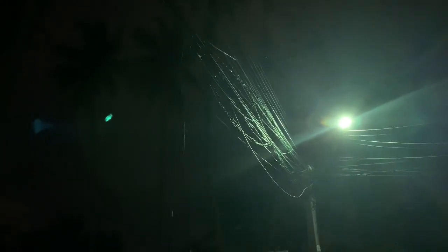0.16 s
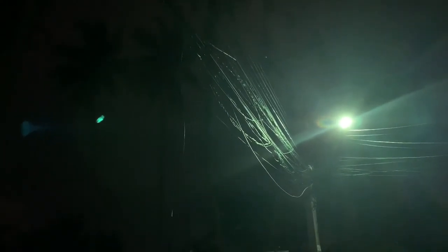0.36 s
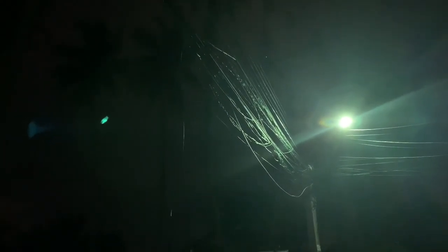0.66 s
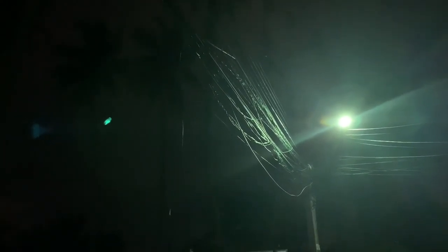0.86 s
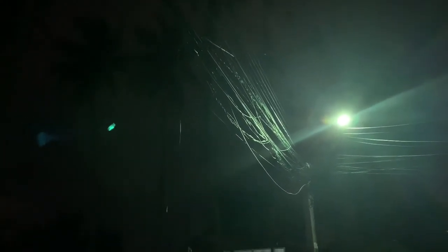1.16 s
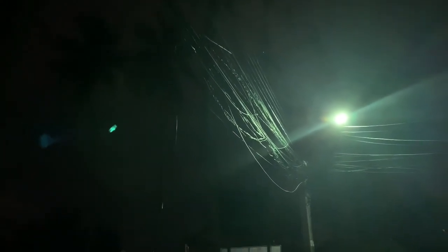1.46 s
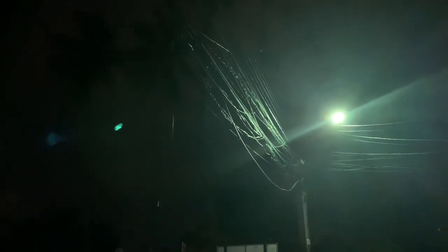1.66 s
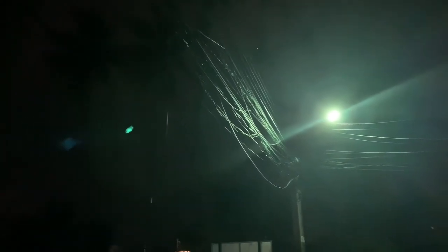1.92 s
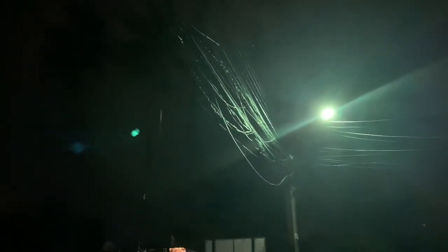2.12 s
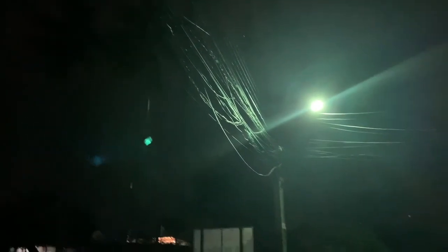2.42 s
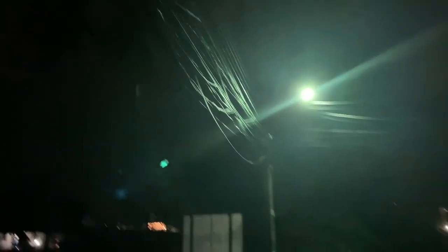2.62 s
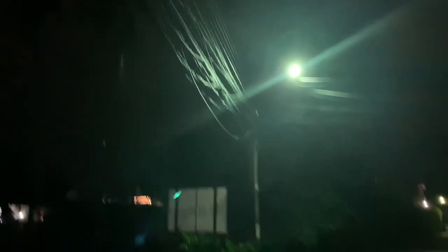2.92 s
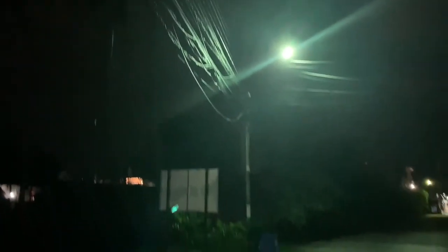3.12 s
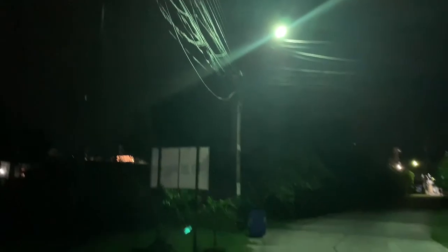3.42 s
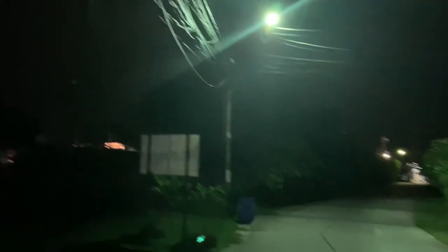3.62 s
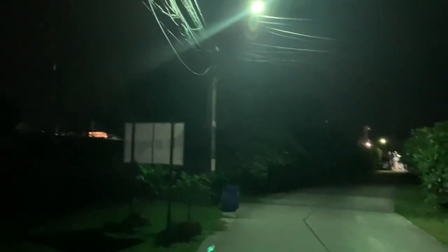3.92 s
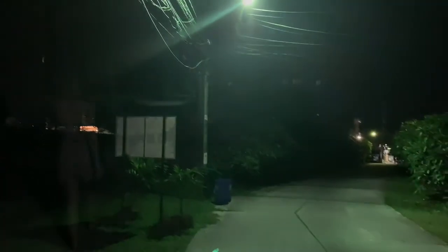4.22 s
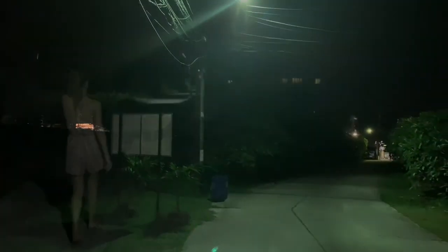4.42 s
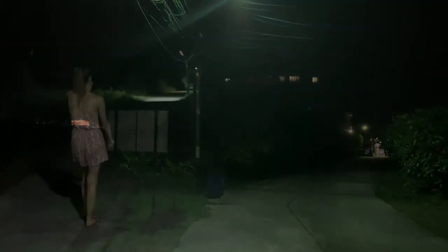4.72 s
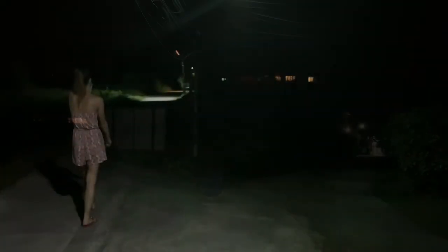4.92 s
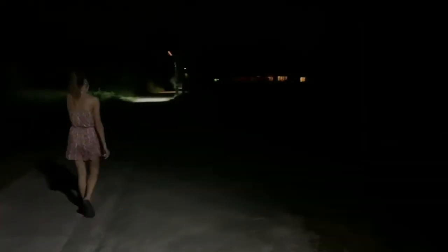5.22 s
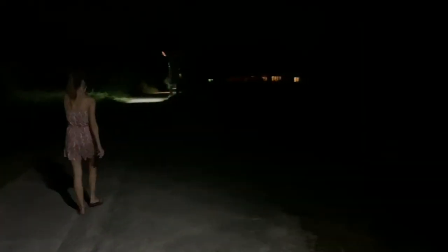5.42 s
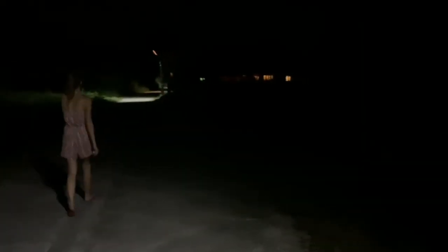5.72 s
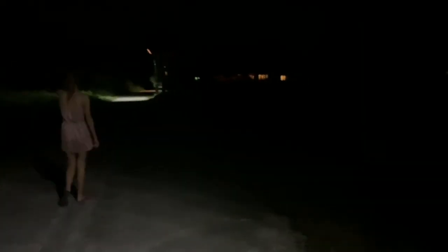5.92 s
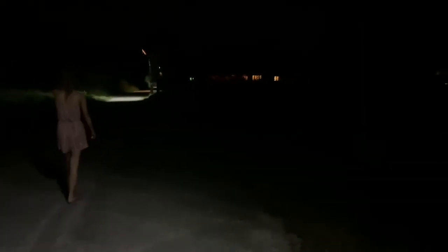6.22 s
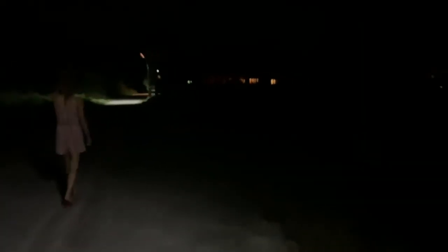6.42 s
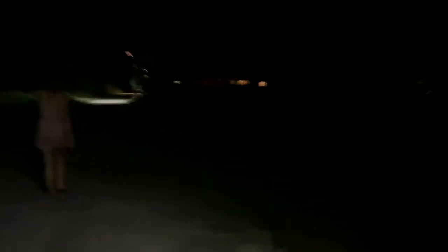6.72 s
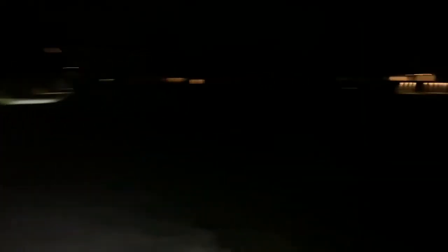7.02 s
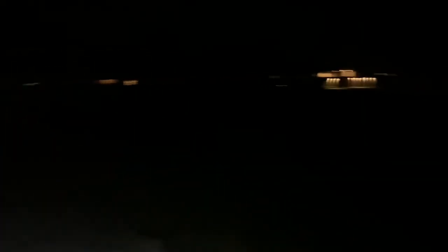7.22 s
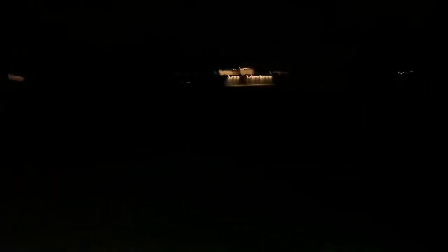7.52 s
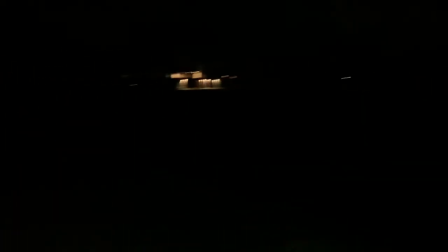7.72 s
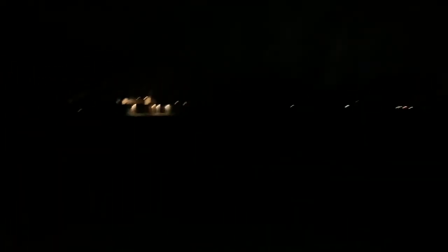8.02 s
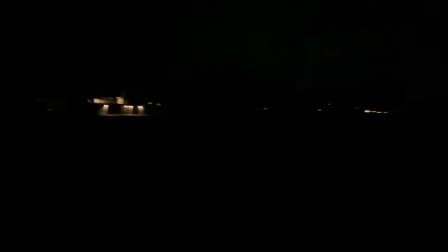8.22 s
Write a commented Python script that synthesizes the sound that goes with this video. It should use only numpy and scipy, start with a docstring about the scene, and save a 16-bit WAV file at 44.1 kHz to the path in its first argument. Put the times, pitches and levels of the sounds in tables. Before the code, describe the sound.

Outdoors at night, a fine, bright electrical buzz sizzles near a power pole, with a thin insect-like trill and a far single-cylinder engine puttering past, then easing off. After about four seconds this crossfades into a marsh: near and far frogs rattle, insects hiss, and one loud shrill trill dominates, pausing briefly. A few soft sandal slaps fall close to the handheld stereo microphone.

```python
"""A sizzle of sparks, a thudding far engine and a thin trill by a power pole dissolve into a marsh at night.
There, frogs rattle, one loud shrill trill calls with short rests, and insects hiss. Now and then a sandal step slaps.
Sparks, engine, frogs and steps are short pulses or noise puffs, most of them ringing a few resonances.
Trills are sliding tones; insects and night air are shaped noise; hums, a peep and a whistle are wavering tones."""
import sys
import numpy as np
from scipy import signal
from scipy.fft import rfft, irfft, next_fast_len
from scipy.io import wavfile
from scipy.ndimage import uniform_filter1d, map_coordinates

SR = 44100
rng = np.random.default_rng(int(sys.argv[2]) if len(sys.argv) > 2 else 0)


def generate_wav(sig):
    """Save sig (samples, or channels by samples) to the path in sys.argv[1] as 16-bit PCM at SR."""
    pcm = np.round(np.clip(np.atleast_2d(sig).T, -1, 1) * 32767).astype(np.int16)
    wavfile.write(sys.argv[1], SR, pcm)


N = 368676
T = np.arange(N) / SR   # time of every sample (s)
# the microphone tilts down, and later turns across the marsh: (from s, to s)
TILT_S, TURN_S = (2.47, 2.78), (7.1, 7.65)


def from_db(db):
    """Turn decibels into gain."""
    return 10 ** (np.asarray(db) / 20)


def rms_one(x):
    """Scale to unit power."""
    return x / np.sqrt(np.mean(x ** 2) + 1e-20)


def ramp(start_s, end_s):
    """Rise from 0 to 1 between two moments."""
    return np.interp(T, [start_s, end_s], [0, 1])


def in_time(rows):
    """Read each column of a table at every sample; the first column is time."""
    s, *columns = np.transpose(rows)
    return [np.interp(T, s, column) for column in columns]


def at_hz(points, hz):
    """Read a table over frequency, joining its points on a log axis."""
    f, value = np.transpose(points)
    return np.interp(np.log(hz + 1), np.log(f), value)


def drift(rate):
    """Wander smoothly and at random with a spread of 1; a higher rate (per s) wanders faster."""
    knots = rng.standard_normal(4000)
    coarse_time = T[::20]
    curve = map_coordinates(knots, [coarse_time * rate * 2], order=3, mode="wrap")
    return np.interp(T, coarse_time, rms_one(curve))


def wavering_turns(hz, spread, rate):
    """Count the cycles of a tone whose pitch wavers by a share (spread) of itself."""
    return np.cumsum(hz * (1 + spread * drift(rate))) / SR


def band(x, hz, width_hz):
    """Pass one flat-topped resonance."""
    edges = np.clip([hz - width_hz / 2, hz + width_hz / 2], 10, .48 * SR)
    return signal.sosfilt(signal.butter(2, edges, "band", fs=SR, output="sos"), x + 1e-18)


def clicks(times, sizes):
    """Place single-sample pulses at the given times."""
    inside = (times >= 0) & (times < (N - 1) / SR)
    return np.bincount((times[inside] * SR).astype(int), sizes[inside], N)


def bursts(pulses, length_s):
    """Turn each pulse into a short puff of noise."""
    window = np.hanning(max(3, int(length_s * SR)))
    return signal.fftconvolve(pulses, window, "same") * rng.standard_normal(N)


def body(pulses, modes, vary_db):
    """Let pulses ring a set of resonances whose balance keeps wandering."""
    return sum(from_db(db + vary_db * drift(40)) * rms_one(band(pulses, hz, width))
               for hz, width, db in modes)


def levelled(x, span_s):
    """Even out the slow loudness and keep the pulsing."""
    power = uniform_filter1d(np.mean(np.atleast_2d(x) ** 2, axis=0), int(span_s * SR))
    return x / np.sqrt(np.abs(power) + .03 * power.max())   # the floor keeps silence quiet


def placed(x, lag_ms, pan_db):
    """Set a source to one side: the left ear hears it later by lag_ms and louder by pan_db."""
    left = np.interp(T - lag_ms / 1000, T, x)
    return np.array([left * from_db(pan_db / 2), x * from_db(-pan_db / 2)])


def outdoors(x, wet_db, t60):
    """Scatter a short tail (60 dB down after t60 s) off road, trunks and leaves; its pattern keeps shifting."""
    age = T[:SR // 2]
    tails = rng.standard_normal((2, 2, len(age))) * from_db(-60 * age / t60) * (age > .003)
    tails /= np.sqrt(np.sum(tails ** 2, axis=2, keepdims=True))
    here, there = signal.fftconvolve(x[None], tails, axes=2)[:, :, :N]
    moved = 2 * np.pi * T + drift(2)   # about one turn a second
    return x + from_db(wet_db) * (np.cos(moved) * here + np.sin(moved) * there)


def beats(first_s, count, gap_s, brisk=(0, 1), tired=(0, 1)):
    """Time the notes of one call: even, but for a brisk start and a tired end (notes, share of the gap)."""
    k = np.arange(count - 1)
    start_share = np.where(k < brisk[0], brisk[1], 1)
    end_share = np.where(k >= len(k) - tired[0], tired[1], 1)
    return first_s + np.append(0, np.cumsum(gap_s * start_share * end_share))


def trill(times, hz, fall_hz, rise_s, fade_s, taper, waver, rough_db, tail=0, bend=0):
    """Each note is a pure tone that swells, then dies as its pitch slides down, ever faster if bent."""
    note = np.searchsorted(times[1:] - rise_s, T)
    age = T - times[note]
    through = np.clip(age / np.where(age < 0, rise_s, fade_s), -1, 1)
    slide = np.clip(age / (rise_s + fade_s), -1, 1)
    wavering = 1 + waver * rng.standard_normal(len(times))[note] + waver * drift(200)
    pitch = (hz - fall_hz * (slide + bend * slide ** 2)) * wavering
    swell = np.abs(np.cos(through * np.pi / 2)) ** taper
    lingering = tail * np.sin(np.pi * np.maximum(through, 0) ** 2)   # a soft tail
    return (swell + lingering) * from_db(rough_db * drift(150)) * np.sin(2 * np.pi * np.cumsum(pitch) / SR)


def air(spectrum):
    """Far rumble and hiss: noise shaped over frequency, much alike in both ears only in the bass."""
    # left-right likeness: f/Hz, likeness (1 = the same)
    likeness = [(50, 0.87), (200, 0.88), (500, 0.28), (1000, 0.027), (4000, 0.033), (12000, 0.092)]
    size = next_fast_len(N)
    hz = np.arange(size // 2 + 1) * SR / size
    mid, side = rfft(rng.standard_normal((2, size))) * from_db(at_hz(spectrum, hz))
    alike = np.clip(at_hz(likeness, hz), -1, 1)
    both_ears = np.sqrt(1 + alike) * mid + np.sqrt(1 - alike) * side * [[1], [-1]]
    return rms_one(irfft(both_ears, size)[:, :N])


def insects(choirs, lag_ms, spread_db=-4):
    """Countless far wings blur into fluttering bands of noise, partly from one side, partly all round."""
    one_side = placed(rng.standard_normal(N), lag_ms, pan_db=-2.5)
    wings = one_side + from_db(spread_db) * rng.standard_normal((2, N))
    return sum(from_db(db + flutter_db * drift(per_s)) * rms_one(band(wings, hz, width))
               for hz, width, db, per_s, flutter_db in choirs)


def hums():
    """Each faint far hum swells and fades on a slightly wavering pitch."""
    # hums: start t/s, end t/s, f/Hz, level/dB
    hum_rows = [(0.8, 3.9, 445, -67), (3.7, 4.96, 386.5, -63.5)]
    tones = 0
    for start, end, hz, db in hum_rows:
        swell = np.sqrt(np.abs(np.sin(np.pi * ramp(start, end))))
        tones = tones + from_db(db) * swell * np.sin(2 * np.pi * wavering_turns(hz, 0.0056, 4.1))
    return placed(tones, lag_ms=0, pan_db=0)


def whistle():
    """One faint falling tone, blurred by a strong tail and a wavering pitch."""
    # path of the call: t/s, f/Hz, level/dB
    falling_call = [(1.34, 1420, -86), (1.45, 1326, -74), (1.58, 1243, -69), (1.7, 1193, -79),
                    (1.9, 1133, -91)]
    hz, db = in_time(falling_call)
    tone = from_db(db) * np.sin(2 * np.pi * wavering_turns(hz, 0.024, 80))
    return outdoors(placed(tone, lag_ms=0, pan_db=1), wet_db=9.0, t60=0.39)


def far_trills():
    """Distant callers of the shrill kind blur into a faint line of sliding notes."""
    # callers: f/Hz, gap between notes/s, level/dB
    far_callers = [(3354, .0345, -60), (3300, .0372, -63), (3080, 0.074, -68.5)]
    voices = sum(from_db(db) * trill(np.arange(0, T[-1], gap_s), hz, fall_hz=450, rise_s=.015, fade_s=.016,
                                     taper=2.2, waver=0.012, rough_db=1.5)
                 for hz, gap_s, db in far_callers)
    return outdoors(placed(voices, lag_ms=0.1, pan_db=2.5), wet_db=0.5, t60=0.16)


def frog_chorus(lag_ms, count=6):
    """Farther frogs rattle over one another: pulse trains, each at its own pace, ring shared resonances."""
    # throat resonances: f/Hz, width/Hz, level/dB
    chorus_modes = [(1555, 300, -0.5), (1862, 220, -5.5), (2500, 1700, -10.5), (3185, 545, 5.5)]
    pulses = np.zeros(N)
    for per_s in np.linspace(48, 62, count):
        turns = np.floor(np.cumsum(per_s * (1 + .04 * drift(3))) / SR + rng.random())
        pulses += np.diff(turns, prepend=turns[0]) * from_db(1.8 * drift(2.0))
    throats = body(pulses, chorus_modes, vary_db=3.0)
    voices = outdoors(placed(throats, lag_ms, pan_db=-1.3), wet_db=-2.5, t60=0.48)
    level_db = -45 - 1.5 * ramp(*TURN_S)   # a little softer as the microphone turns
    return from_db(level_db) * levelled(voices, span_s=0.61)


def drone(speed, turns):
    """Low multiples of the firing rate sound as tones that swell and fade, firmer the faster the engine runs."""
    # tones: multiple of the firing rate, level/dB
    orders = [(3, -5), (4, -8), (5, -5), (6, 0), (7, -6)]
    tones = sum(from_db(db + 2.5 * drift(1.2)) * np.sin(2 * np.pi * (order * turns + rng.random()))
                for order, db in orders)
    level_db = -47.5 - 2 * (speed.max() - speed)   # 2 dB softer for each firing per s below top speed
    return placed(from_db(level_db) * levelled(tones, span_s=0.45), lag_ms=0, pan_db=-4)


def engine():
    """A single-cylinder engine: each firing is a dull exhaust thud with a close echo, over a low drone."""
    # engine speed: t/s, firings per s
    engine_speed = [(.9, 13), (1.054, 15.5), (1.25, 19), (1.6, 17.2), (2.012, 18), (2.541, 19.8),
                    (2.984, 20.9), (3.517, 20.4), (3.982, 14.1), (4.767, 13.9)]
    firing_s = 1.046   # the moment of one firing; all others follow from the speed
    echo_s, echo_db = .009, -16
    enters_s, attack_s, far_db = 0.6, 0.62, -23   # it swells from this far below full level
    shut_s, idle_s, release_s = 3.52, 3.93, 0.056   # throttle shuts; picks up at idle; length of each change
    speed, = in_time(engine_speed)
    turns = np.cumsum(speed) / SR
    turns = turns - np.interp(firing_s, T, turns)
    times = T[1:][np.diff(np.floor(turns)) > 0]
    strength = from_db(rng.standard_normal(len(times)))
    firings = clicks(times, strength) + clicks(times + echo_s, from_db(echo_db) * strength)
    muffler = signal.cheby1(8, 1, 292, fs=SR, output="sos")   # dulls everything above 292 Hz
    muffled = signal.sosfilt(muffler, band(firings, 168, 183))
    exhaust = muffled + from_db(-22.5) * band(firings, 398, 77)   # with a faint pipe ring
    thuds = outdoors(placed(exhaust, lag_ms=0, pan_db=-0.7), wet_db=-15, t60=.3)
    throttle_db = -10 * ramp(shut_s, shut_s + release_s) + 4 * ramp(idle_s, idle_s + release_s)
    far = 1 - ramp(enters_s, enters_s + attack_s)
    running = from_db(-45.5) * levelled(thuds, span_s=1.0) + drone(speed, turns)
    return from_db(far_db * far) * from_db(throttle_db) * running


def peep(lag_ms):
    """One short reedy note out of the marsh: a few upper partials of one pitch."""
    # partials: multiple of the pitch, level/dB
    partials = [(3, -50), (5, -42), (6, -57)]
    start_s, end_s, hz = 4.955, 5.012, 696
    turns = wavering_turns(hz, 0.0028, 87)
    tone = sum(from_db(db) * np.sin(2 * np.pi * k * turns) for k, db in partials)
    swell = np.sin(np.pi * ramp(start_s, end_s))
    return outdoors(placed(swell * tone, lag_ms, pan_db=2.0), wet_db=-1, t60=0.17)


def high_trill():
    """A faint, very high caller joins briefly with steeply sliding, uneven notes."""
    times = beats(first_s=4.935, count=12, gap_s=.0496)
    notes = trill(times, hz=5200, fall_hz=1300, rise_s=0.011, fade_s=0.021, taper=1.4, waver=.01, rough_db=3)
    uneven_db = 2.5 * drift(6)
    return outdoors(placed(from_db(-57.5 + uneven_db) * notes, lag_ms=0.069, pan_db=-1.0), wet_db=-10, t60=0.19)


def thin_trill():
    """A thin trill: a few slow, quickening notes, then 24 a second. A lower neighbour answers faintly."""
    # answering calls: first note t/s, notes, level/dB
    replies = [(1.105, 5, -60), (1.74, 3, -63), (2.18, 2, -62), (3.427, 2, -53)]
    reply_gap_s = .07
    first, count, gap, shortening = 1.095, 7, .079, .0023   # opening: s, notes, first gap s, s less each gap
    slow_notes = first + np.append(0, np.cumsum(gap - shortening * np.arange(count - 1)))
    answers = np.concatenate([beats(s, notes, reply_gap_s) for s, notes, _ in replies])
    answer_db, = in_time([(s + k * reply_gap_s, db) for s, notes, db in replies for k in (0, notes)])
    opening = trill(slow_notes, hz=4270, fall_hz=720, rise_s=.016, fade_s=.034, taper=6,
                    waver=.006, rough_db=2.2, tail=.2, bend=.6)
    run_times = beats(first_s=1.609, count=76, gap_s=.04172, brisk=(5, .92))
    running = trill(run_times, hz=4175, fall_hz=500, rise_s=.017, fade_s=.026, taper=3.2,
                    waver=.005, rough_db=2.2, tail=.22, bend=.8)
    answer = trill(answers, hz=3100, fall_hz=450, rise_s=.012, fade_s=.026, taper=1.6, waver=.004, rough_db=2)
    opening_db = -44.5 - 13 * (1 - ramp(first, first + 0.22))   # starts 13 dB down
    running_db = -50.5 + 3.5 * ramp(*TILT_S)   # louder as the microphone tilts down
    voice = from_db(opening_db) * opening + from_db(running_db) * running + from_db(answer_db) * answer
    return outdoors(placed(voice, lag_ms=0.034, pan_db=1.0), wet_db=-3.5, t60=0.084)


def steps(slap_t60=0.026, grit_t60=0.05):
    """A sole slaps out a hollow puff of air and grinds a little grit: two quickly dying noises."""
    # steps and scuffs: t/s, slap level/dB, grit level/dB
    footfalls = [(0.254, -53, -40), (4.528, -47, -62), (6.369, -47.5, -66), (6.515, -30, -62),
                 (6.609, -53, -60), (6.686, -49, -66), (7.531, -36.5, -47), (7.543, -37.5, -34),
                 (7.59, -44, -66), (8.159, -35.5, -60)]
    # hollow rings of the slap: f/Hz, width/Hz, level/dB
    slap_modes = [(199, 39, -12.5), (537, 340, -6), (977, 240, -6)]
    slap, grit = np.zeros((2, N))
    for s, db, grit_db in footfalls:
        age = np.clip(T - s, 0, 1)
        slap += (T > s) * from_db(db - 60 * age / slap_t60)
        grit += (T > s) * from_db(grit_db - 60 * age / grit_t60)
    # the square root makes up for what a narrow band loses
    puff = sum(from_db(db) * np.sqrt(SR / 2 / width) * band(slap * rng.standard_normal(N), hz, width)
               for hz, width, db in slap_modes)
    slaps = outdoors(placed(puff, lag_ms=0.23, pan_db=5.5), wet_db=-10, t60=0.31)
    soften = signal.butter(1, 4000, fs=SR, output="sos")
    return slaps + signal.sosfilt(soften, grit * rng.standard_normal((2, N)))


def sparks(vary_db):
    """Sparks jump near each voltage crest of the mains, somewhat harder on one polarity."""
    # sparks within one mains cycle: delay/s, scatter/s, chance (0 to 1), level/dB
    spark_rows = [(.0081, 0.00014, 1, 3.5), (0.0097, 0.0003, 1, 4.5), (.0148, .0004, .7, -17),
                  (0.0167, .0003, 0.66, 1.5), (0.019, 0.00053, 1, 1)]
    mains_hz = 49.977
    cycles, train = np.arange(0, 5.1, 1 / mains_hz), 0
    for delay, scatter, chance, db in spark_rows:
        late, size = rng.standard_normal((2, len(cycles)))
        sizes = from_db(db + vary_db * size) * (rng.random(len(cycles)) < chance)
        train = train + clicks(cycles + delay + scatter * late, sizes)
    return bursts(train, length_s=0.0014)


def sizzle():
    """Two insulators spark, one duller, one brighter and more to the left; their rings have steep edges."""
    # rings of the sparks, dull to bright: f/Hz, width/Hz, level/dB
    spark_modes = [(7060, 3200, -8), (10190, 2320, 0), (13270, 2100, 4), (15500, 700, -12)]

    def ringing(puffs, modes):
        """Filter each ring twice for steep edges."""
        return sum(from_db(db) * rms_one(band(band(puffs, hz, width), hz, width)) for hz, width, db in modes)

    dull_rings = ringing(sparks(vary_db=-1.4), spark_modes[:2])
    dull = outdoors(placed(dull_rings, lag_ms=0.022, pan_db=-0.5), wet_db=-8.5, t60=0.3)
    bright_rings = ringing(sparks(vary_db=1.7), spark_modes[2:])
    bright = outdoors(placed(bright_rings, lag_ms=0.014, pan_db=4.0), wet_db=-9, t60=0.3)
    tilt = ramp(*TILT_S)
    crackle = dull + from_db(4 * (tilt - .5)) * bright   # brightens by 4 dB as the microphone tilts
    level_db = -49.5 + 0.8 * tilt + 0.95 * drift(2.07)
    return from_db(level_db) * levelled(crackle, span_s=0.123)


def near_frogs(lag_ms, scatter=0.016, jitter_s=0.00055, vary_db=1.5):
    """Each rattle is a train of short snaps; each snap sets all the throat's rings going together."""
    # rattles: start t/s, t/s of the pulse that sets the timing, end t/s, pulses per s, level/dB,
    # throat f/Hz, low ring f/Hz, middle ring f/Hz, level of these two rings/dB;
    # only snaps from start to end sound, so a row that ends before it starts is silent
    rattles = [(4.32, 4.54, 4.74, 58, -31.5, 3070, 1484, 1920, -9),
               (4.7, 4.9, 5.2, 49, -44.5, 3080, 1510, 1870, -0.5),
               (4.945, 5.158, 4.93, 59, -38, 2960, 1520, 1930, -8),
               (4.98, 5.105, 5.3, 59, -33.5, 3020, 1510, 1880, -10.5),
               (5.3, 5.421, 5.7, 58, -37.5, 3010, 1540, 1800, -9),
               (5.568, 5.678, 5.8, 60, -38, 2980, 1520, 1800, -5),
               (5.865, 6.006, 7.2, 54, -42.5, 3040, 1580, 1850, -6),
               (6.13, 6.294, 6.6, 62, -35, 3110, 1500, 1840, -9.5),
               (6.376, 6.458, 6.68, 55, -39, 2880, 1550, 1830, -5),
               (6.83, 6.998, 8.1, 50, -40, 3120, 1570, 2380, -4),
               (7.15, 7.455, 7.65, 54, -36.5, 2900, 1390, 1520, -8),
               (7.242, 7.52, 7.52, 53, -30.5, 3000, 1440, 2330, -10),
               (7.468, 7.61, 7.69, 55, -33, 2870, 1460, 2220, -7.5),
               (7.727, 7.877, 7.87, 52, -37.5, 2930, 1430, 2080, -3),
               (7.731, 7.886, 8.3, 52.5, -38.5, 2800, 1440, 2220, -3.5),
               (7.803, 7.95, 7.6, 63, -37, 3040, 1410, 2250, -4.5),
               (8.028, 8.1, 8.14, 54, -38, 3040, 1416, 2160, 0),
               (8.134, 8.229, 8.3, 52, -33, 2910, 1424, 2120, -8.5)]
    # upper throat rings: multiple of the throat pitch, half length/s, level/dB
    throat_modes = [(0.87, 0.00058, -9), (0.999, 0.0012, 2), (1.1, 0.001, -13), (1.32, 0.0009, -17)]
    # one pulse is a main snap between two weak ones: delay/s, level/dB
    pulse_snaps = [(-.003, -9), (0, 0), (.0045, -10)]
    edge_db = -6.5   # level at start and end, against the pulse that sets the timing
    low_length_s, middle_length_s = 0.0019, 0.0017   # half lengths of the two lower rings
    out, age = np.zeros(N + SR), np.arange(-400, 400) / SR
    for start, timing, end, per_s, db, throat_hz, low_hz, middle_hz, lower_db in rattles:
        modes = [(throat_hz * multiple, length_s, ring_db) for multiple, length_s, ring_db in throat_modes]
        modes += [(low_hz, low_length_s, lower_db), (middle_hz, middle_length_s, lower_db)]
        hz, length_s, ring_db = np.transpose(modes)[:, :, None]
        snaps = [(timing + k / per_s + delay, snap_db) for k in range(-20, 20) for delay, snap_db in pulse_snaps]
        chances = rng.standard_normal((len(snaps), 2, len(modes), 1))
        lateness = rng.standard_normal(len(snaps))
        for (s, snap_db), (sharp, loud), late in zip(snaps, chances, lateness):
            if start <= s <= end:
                effort_db = db + snap_db + np.interp(s, [start, timing, end], [edge_db, 0, edge_db])
                swell = from_db(effort_db + ring_db + vary_db * loud) * np.exp(-(age / length_s) ** 2)
                rings = swell * np.sin(2 * np.pi * hz * (1 + scatter * sharp) * age)
                at = int((s + jitter_s * late + age[0]) * SR)
                out[at:at + len(age)] += np.sum(rings, axis=0)
    return outdoors(placed(out[:N], lag_ms, pan_db=-1.0), wet_db=-4.5, t60=0.15)


def shrill_trill():
    """The loud near trill: about 29 sliding notes a second, in calls with short rests."""
    # calls: first note t/s, notes
    shrill_calls = [(3.496, 40), (5.304, 73), (8.297, 40)]
    # loudness, greatest once the microphone faces it: t/s, level/dB
    shrill_level = [(4.3, -27.5), (4.7, -27), (5.5, -24), (5.9, -24), (6.25, -26), (6.9, -24.5),
                    (7.2, -24.5), (7.5, -26), (7.66, -22), (7.78, -26), (8.3, -29.5)]
    gap_s, brisk, tired = .034905, (18, .967), (11, 1.036)   # (notes, share of the gap)
    attack_s, onset_db, release_s, end_db = 0.14, -5.5, 0.063, -0.5
    calls = [beats(first, count, gap_s, brisk, tired) for first, count in shrill_calls]
    notes = trill(np.concatenate(calls), hz=3421, fall_hz=595, rise_s=.0165, fade_s=.0128, taper=1.61,
                  waver=0.0032, rough_db=1.0, bend=0.65)
    # every call swells, holds and sinks slightly
    effort = [point for call in calls for point in (
        (call[0], onset_db), (call[0] + attack_s, 0), (call[-1] - release_s, 0), (call[-1], end_db))]
    effort_db, = in_time(effort)
    level_db, = in_time(shrill_level)
    voice = from_db(level_db + effort_db) * notes
    lag_ms = np.interp(T, TURN_S, (0.076, -0.033))   # its place shifts as the microphone turns
    pan_db = np.interp(T, TURN_S, (-2, -1.5))
    return outdoors(placed(voice, lag_ms, pan_db), wet_db=-21.0, t60=0.036)


def scene():
    """Everything by the pole dissolves into everything by the marsh; the steps go on across both."""
    # night air: f/Hz, relative level/dB
    pole_air = [(20, -36), (40, -9.5), (65, 3), (105, -1), (200, -7), (330, -15.5), (480, -20),
                (700, -25.5), (1100, -29), (1600, -26), (2300, -34), (4500, -27), (8000, -28.5),
                (16000, -42)]
    marsh_air = [(20, -57), (40, -2.5), (62, 2), (125, 0.5), (200, -10.5), (320, -18.5), (700, -24.5),
                 (1100, -23.5), (3800, -16), (4900, -44.5), (8000, -31.5), (11000, -16.5), (12000, -63),
                 (16000, -77)]
    # insect choirs: f/Hz, width/Hz, level/dB, flutter per s, flutter/dB
    pole_insects = [(3380, 160, -81.5, 13, 4.5), (3490, 1200, -62, 25, 1.5), (6760, 2300, -66, 25, 3.5),
                    (10430, 1300, -61.5, 44, 2.5)]
    marsh_insects = [(6204, 450, -60, 84, 1.1), (7210, 370, -74.5, 15, 1), (9390, 610, -55, 21, 0.26)]
    lag_ms = np.interp(T, TURN_S, (0.282, -0.025))   # the marsh shifts as the microphone turns
    lean = from_db(0.35 * np.array([[-1], [1]]))   # the air is a little stronger on the right
    by_pole = (from_db(-49.0) * lean * air(pole_air) + insects(pole_insects, lag_ms=0.066)
               + thin_trill() + far_trills() + whistle() + sizzle() + engine() + hums())
    by_marsh = (from_db(-47.0) * lean * air(marsh_air) + insects(marsh_insects, lag_ms)
                + shrill_trill() + high_trill() + peep(lag_ms) + near_frogs(lag_ms) + frog_chorus(lag_ms))
    marsh = ramp(4.1, 5.1)
    return (1 - marsh) * by_pole + marsh * by_marsh + steps()


def record(dry):
    """Cut the treble steeply above 15750 Hz."""
    return signal.sosfilt(signal.ellip(10, .2, 80, 15750, fs=SR, output="sos"), dry)


dry = scene()
out = record(dry)
generate_wav(out)
```